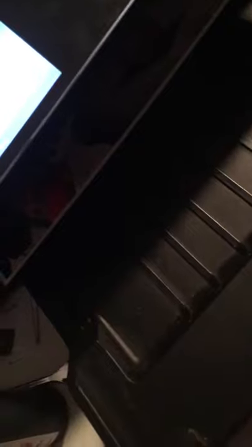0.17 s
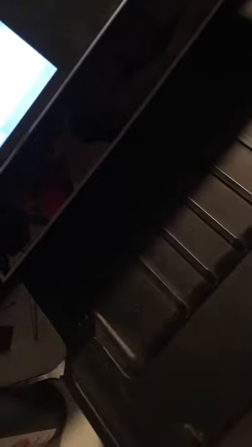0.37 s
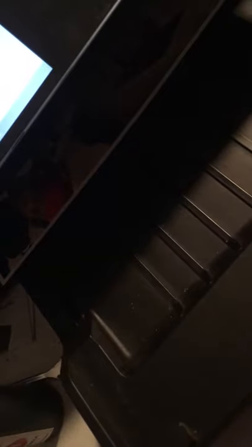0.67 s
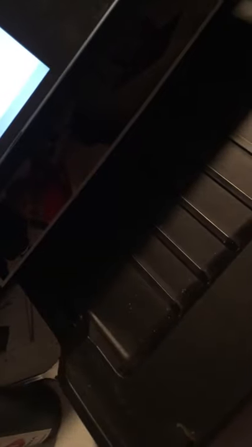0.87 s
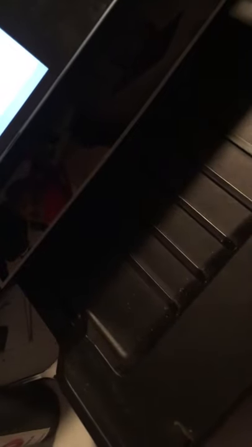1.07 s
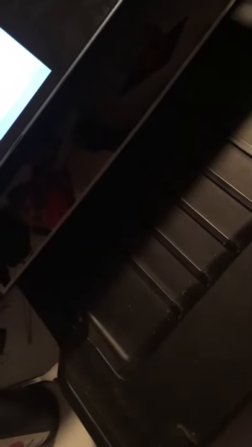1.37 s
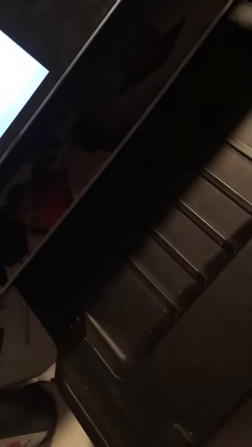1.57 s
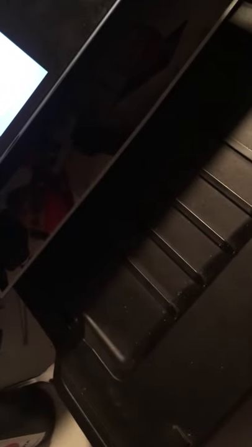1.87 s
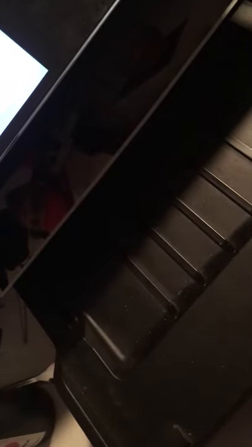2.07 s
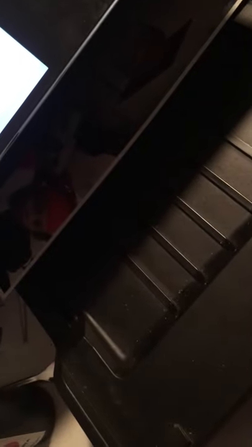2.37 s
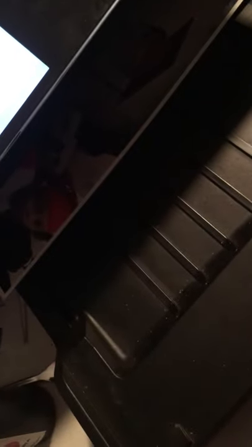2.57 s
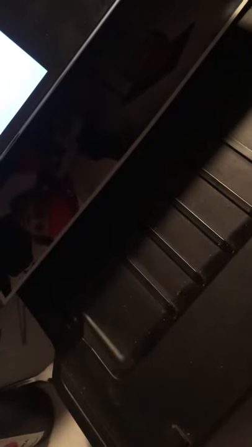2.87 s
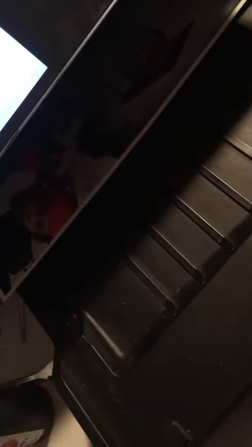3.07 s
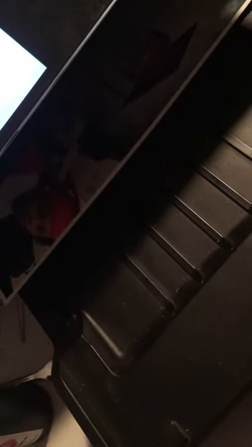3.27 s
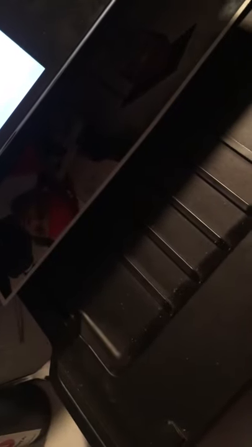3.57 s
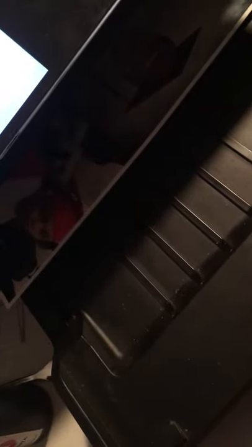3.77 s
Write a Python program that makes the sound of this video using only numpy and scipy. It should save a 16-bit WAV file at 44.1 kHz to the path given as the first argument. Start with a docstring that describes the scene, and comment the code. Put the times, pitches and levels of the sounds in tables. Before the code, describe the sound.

A printer at work indoors: short motor whines, sliding hiss, rhythmic clatters and low thumps.

```python
"""Room rumble, fan hum and the tail of a paper-feed clatter open, then a casing thump: an inkjet printer at work.
The carriage sweeps to and fro: whine harmonics follow its speed, and coloured noise with rail rings is the sliding hiss.
At each turn the feed clatters (struck gear and panel modes, sheet hiss) and the casing thumps (low modes).
A short echo follows the printer. Mono microphone, two equal channels."""
import sys
import numpy as np
from scipy import signal
from scipy.fft import rfft, irfft
from scipy.io import wavfile

SR = 44100
rng = np.random.default_rng(int(sys.argv[2]) if len(sys.argv) > 2 else 0)


def store_wav(level_fs):
    """Save 16-bit WAV to argv[1]."""
    pcm = np.round(np.clip(np.atleast_2d(level_fs), -1, 1) * 32767)
    wavfile.write(sys.argv[1], SR, pcm.T.astype(np.int16))


def voltage_ratio(level):
    """Linear amplitude factor for a level in decibels (scalar or array-like)."""
    return 10 ** (np.asarray(level, float) / 20)


N = 172872

# carriage turns with paper feed, outward and return strokes alternating: start_s, relative clatter_db, hiss_db
TURNS = [(.012, -56, -54.5), (.469, -50.5, -63), (.918, -54, -59.5), (1.371, -51, -61),
         (1.821, -50.5, -60.5), (2.275, -49, -61), (2.726, -52, -60), (3.179, -50, -61.5),
         (3.631, -54.5, -59.5)]
# feed gear modes: pitch_hz, relative level_db, t60_s
GEAR_MODES = [(2343, -6, 0.033), (2445, -9.5, 0.019), (2016, -12.5, 0.026), (2810, -16, 0.024),
              (3200, -18, 0.025)]
# plastic panel modes: pitch_hz, relative level_db, t60_s, rattle lag_s
PANEL_MODES = [(248, 2.5, 0.05, 0.0373), (324, -2, 0.067, 0.019), (394, -0.5, 0.064, 0.0084),
               (642, -0.5, 0.033, 0.02), (876, 5, 0.022, 0.0063), (1120, -2, 0.023, 0.0053),
               (1420, -7, 0.011, 0.0047), (1660, -8.5, 0.017, 0.00083)]


def rms_one(x):
    """Scales to rms 1."""
    return x / np.sqrt(np.mean(x ** 2) + 1e-20)


def drift(rate_hz):
    """Slow random wander of rms 1: noise through two equal poles at rate_hz."""
    hop = 40  # samples between computed points
    pole = np.exp(-2 * np.pi * rate_hz * hop / SR)
    noise = rng.standard_normal(N // hop + 2002)
    slow = signal.lfilter([1], [1, -2 * pole, pole * pole], noise)[2000:]
    return np.interp(np.arange(N) / hop, np.arange(len(slow)), rms_one(slow))


def ring(drive, pitch_hz, t60_s):
    """Two-pole resonator: a unit click starts a decaying sine of height about 1."""
    r = voltage_ratio(-60 / (t60_s * SR))
    w = 2 * np.pi * pitch_hz / SR
    return signal.lfilter([0, np.sin(w)], [1, -2 * r * np.cos(w), r * r], drive + 1e-18)


def coloured(spectrum, patchy_db):
    """Noise of the given spectrum, rms 1; half-octave bands flicker independently."""
    hz, level_db = np.transpose(spectrum)
    f = np.maximum(np.fft.rfftfreq(N, 1 / SR), 1)
    gain_db = np.interp(np.log(f), np.log(hz), level_db, left=-60, right=-60)
    shaped = rfft(rng.standard_normal(N)) * voltage_ratio(gain_db)
    band = np.round(2 * np.log2(f)).astype(int)
    lowest = band[f >= hz[0] / 2][0]
    total = np.zeros(N)
    for b in range(lowest, band[-1] + 1):
        total += irfft(shaped * (band == b), N) * voltage_ratio(patchy_db * drift(8))
    return rms_one(total)


def stroke():
    """Time since the last turn and the index of that turn."""
    t = np.arange(N) / SR
    turn_s = np.array(TURNS)[:, 0]
    k = np.maximum(np.searchsorted(turn_s, t, "right") - 1, 0)
    return t - turn_s[k], k


def along(table):
    """Reads the outward or the return column over each stroke."""
    since_s, k = stroke()
    s, out, back = np.transpose(table)
    return np.where(k % 2, np.interp(since_s, s, back), np.interp(since_s, s, out))


def gate(since_s, rise_s, hold_s, fall_s):
    """Linear rise, level until hold_s, then exponential fall with time constant fall_s."""
    return np.clip(since_s / rise_s, 0, 1) * np.exp(-np.maximum(since_s - hold_s, 0) / fall_s)


def grains(rate_per_s, spread_db):
    """Random clicks of uneven size and sign."""
    hit = rng.random(N) < rate_per_s / SR
    size = voltage_ratio(spread_db * np.minimum(rng.exponential(1, N), 4))
    return hit * size * rng.choice([-1, 1], N)


def strike(events, modes, spread_db, contact_s):
    """Each blow excites every mode with its own random strength and a delay below contact_s."""
    s, db = np.transpose(events)
    vary = rng.standard_normal((len(s), len(modes)))
    late = rng.random((len(s), len(modes)))
    out = np.zeros(N)
    for k, mode in enumerate(modes):
        clicks = np.zeros(N)
        at = ((s + contact_s * late[:, k]) * SR).astype(int)
        clicks[at] = voltage_ratio(db + mode[1] + spread_db * vary[:, k])
        out += ring(clicks, mode[0], mode[2])
    return out


def room_tone():
    """Coloured noise and a low room resonance for rumble; fan lines wavering in level and phase."""
    # room noise spectrum: pitch_hz, relative density_db (per Hz)
    room_spectrum = [(18, -36), (30, -2.5), (118, 2), (303, -11.5), (473, -20), (1010, -14.5), (1760, -26),
                     (1950, -22), (2170, -27), (5030, -36.5), (7070, -35), (10200, -42.5), (11700, -42),
                     (16000, -42)]
    # fan lines: pitch_hz, rms level_db
    fan_lines = [(194, -64.5), (243, -70.5), (291.5, -68), (388, -72.5), (587, -80.5)]
    t = np.arange(N) / SR
    fan = np.zeros(N)
    for hz, db in fan_lines:
        level = np.sqrt(2) * voltage_ratio(db + 3.46 * drift(2.16))
        fan += level * np.sin(2 * np.pi * hz * t + 1.0 * drift(2.9))
    noise = voltage_ratio(-53.5) * coloured(room_spectrum, patchy_db=2)
    rumble = voltage_ratio(-62.5) * rms_one(ring(rng.standard_normal(N), pitch_hz=56.7, t60_s=0.29))
    return noise + fan + rumble


def paper_feed():
    """Click-driven gear and panel modes for ticks, chatter and rattle; gated noise for the sheet's hiss."""
    # feed gear ticks: start_s, relative level_db
    ticks = [(0.476, -40), (0.9184, -38.5), (0.9287, -42), (0.971, -47), (1.3703, -42.5), (1.8206, -43),
             (1.8514, -53), (1.8775, -45), (2.2766, -43.5), (2.3476, -53), (2.7269, -37), (2.7327, -47),
             (2.7454, -44.5), (2.7756, -46), (2.7936, -55), (3.1785, -43), (3.189, -40), (3.6306, -46),
             (3.6577, -34.5), (3.6787, -48)]
    # sheet hiss spectrum: pitch_hz, relative density_db (per Hz)
    sheet_spectrum = [(1530, -37), (2600, -3), (4490, 1), (4920, -4.5), (6620, 3.5), (10300, -3),
                      (11700, 2), (16000, -9.5)]
    since_s, k = stroke()
    _, clatter_db, hiss_db = np.array(TURNS)[k].T

    chatter_clicks = grains(600, spread_db=2.5) * gate(since_s, rise_s=0.0022, hold_s=0.077, fall_s=0.0071)
    chatter = sum(voltage_ratio(db) * ring(chatter_clicks, hz, t60_s) for hz, db, t60_s in GEAR_MODES)
    gear = strike(ticks, GEAR_MODES, spread_db=-1.0, contact_s=0.0013) + voltage_ratio(-63.5) * chatter

    panels = np.zeros(N)
    for hz, db, t60_s, lag_s in PANEL_MODES:
        envelope = gate(since_s - lag_s, rise_s=0.002, hold_s=0.047, fall_s=0.022)
        clicks = grains(700, spread_db=3.0) * envelope * voltage_ratio(clatter_db - 12)
        panels += voltage_ratio(db) * ring(clicks, hz, t60_s)

    sheet = coloured(sheet_spectrum, patchy_db=2.5) * voltage_ratio(hiss_db + 2.0 * drift(120))
    sheet = sheet * gate(since_s, rise_s=0.0012, hold_s=0.044, fall_s=0.0083)
    return gear + panels + sheet


def casing():
    """Struck low modes thump over a noise-driven drone; panel modes give clunks, panel and gear modes knocks."""
    # casing thumps: start_s, relative level_db
    thumps = [(0.076, -36.5), (0.097, -58), (0.509, -37), (0.554, -36.5), (0.967, -41), (0.993, -42),
              (1.411, -33.5), (1.446, -37), (1.87, -39), (1.9, -42.5), (2.317, -35.5), (2.369, -39),
              (2.776, -36.5), (2.803, -48), (3.224, -33), (3.274, -39), (3.681, -39), (3.709, -41)]
    # casing modes: pitch_hz, relative level_db, t60_s
    casing_modes = [(94, -14, 0.082), (112.6, -1, 0.28), (131.7, -1.5, 0.11), (200.4, -10.5, 0.13)]
    # casing drone over a stroke: after_turn_s, outward_db, return_db
    drone_levels = [(0, -58, -59.5), (.08, -54.5, -48), (.2, -56, -49), (.25, -56.5, -62.5),
                    (.45, -57.5, -60.5)]
    # clunks as the feed takes hold: start_s, relative level_db
    clunk_blows = [(0.481, -38), (0.927, -42), (1.388, -45), (1.838, -41), (2.288, -35), (2.737, -34),
                   (3.189, -39), (3.643, -32.5)]
    # small mid-stroke knocks: start_s, relative level_db
    knock_blows = [(0.61, -43), (0.833, -47), (1.5, -41), (1.736, -42.5), (2.419, -51), (2.64, -42),
                   (3.319, -49), (3.541, -41.5)]
    spread_db, knock_contact_s = 1.5, 0.012
    thump = voltage_ratio(-4.5) * strike(thumps, casing_modes, spread_db, contact_s=0.0013)
    drone = voltage_ratio(along(drone_levels)) * rms_one(ring(rng.standard_normal(N), pitch_hz=112.26, t60_s=0.21))
    clunks = voltage_ratio(-9) * strike(clunk_blows, PANEL_MODES[2:], spread_db, contact_s=0.014)
    body = strike(knock_blows, PANEL_MODES, spread_db, knock_contact_s)
    snap = strike(knock_blows, GEAR_MODES, spread_db, knock_contact_s)
    return thump + drone + clunks + voltage_ratio(-9.5) * (body + snap)


def motor_whine():
    """Harmonics of the belt-tooth rate follow carriage speed and excite housing resonances."""
    # carriage speed over a stroke: after_turn_s, share of full speed
    speed_curve = [(.07, .45), (.132, .82), (.147, .90), (.167, .965), (.19, 1.0), (.385, 1.0), (.405, .94),
                   (.42, .83), (.46, .45)]
    # whine over a stroke: after_turn_s, outward_db, return_db
    whine_levels = [(.11, -84, -90), (.145, -60, -56), (.18, -68.5, -67), (.22, -62.5, -64.5),
                    (.29, -58.5, -66), (.325, -54, -61), (.37, -58.5, -73), (.415, -63, -62.5),
                    (.44, -107, -88)]
    # overtones: multiple, relative level_db
    overtones = [(1, -3.5), (2, -14), (3, -21)]
    # ringing housing resonances: pitch_hz, added gain_db on top, t60_s
    housing = [(899, 10, 0.15), (1956, 8, 0.046)]
    # tenth overtone over a stroke: after_turn_s, level_db
    tenth_levels = [(.11, -90), (.135, -71), (.17, -75.5), (.22, -78.5), (.37, -75.5), (.405, -71),
                    (.43, -92)]
    full_speed_hz, waver_share, flicker_db = 1008, 0.005, 4.0
    since_s, _ = stroke()
    speed = np.interp(since_s, *np.transpose(speed_curve)) * (1 + waver_share * drift(23))
    phase = 2 * np.pi * np.cumsum(full_speed_hz * speed) / SR

    whine = np.zeros(N)
    for k, (multiple, db) in enumerate(overtones):
        whine += np.sqrt(2) * voltage_ratio(db + flicker_db * drift(60)) * np.sin(multiple * phase + k)
    whine = voltage_ratio(along(whine_levels)) * whine

    resonant = np.zeros(N)
    for hz, db, t60_s in housing:
        unit_gain = 2 * np.log(1000) / (t60_s * SR)  # brings the resonance peak to about 1
        resonant += voltage_ratio(db) * unit_gain * ring(whine, hz, t60_s)

    tenth_db = np.interp(since_s, *np.transpose(tenth_levels)) + flicker_db * drift(57)
    return whine + resonant + np.sqrt(2) * voltage_ratio(tenth_db) * np.sin(10 * phase)


def carriage_whistle():
    """Rough sine that climbs in pitch as the outward stroke gathers speed."""
    # whistle over an outward stroke: after_turn_s, pitch_hz, level_db
    whistle_curve = [(.09, 3100, -92), (.115, 3350, -78), (.17, 3950, -75), (.21, 4200, -76),
                     (.24, 4250, -90)]
    since_s, turn = stroke()
    s, pitch_hz, level_db = np.transpose(whistle_curve)
    level = voltage_ratio(np.interp(since_s, s, level_db) + 2.1 * drift(53))
    rough_hz = np.interp(since_s, s, pitch_hz) * (1 + 0.02 * drift(150))
    outward = turn % 2 == 0
    return outward * level * np.sqrt(2) * np.sin(2 * np.pi * np.cumsum(rough_hz) / SR)


def sliding_hiss():
    """Coloured noise plus grain-driven rail resonances, levelled along the stroke."""
    # hiss over a stroke: after_turn_s, outward_db, return_db
    slide_levels = [(.07, -100, -73), (.10, -69, -72), (.14, -62, -61), (.20, -62.5, -61.5),
                    (.30, -63.5, -62.5), (.365, -65, -61.5), (.39, -55.5, -59.5), (.415, -64.5, -63.5),
                    (.45, -73, -71.5)]
    # hiss spectrum: pitch_hz, relative density_db (per Hz)
    slide_spectrum = [(710, -13), (1200, -12.5), (1570, 0.5), (1850, -18.5), (2000, -8.5), (2730, -7.5),
                      (2950, -8), (3540, -9), (3990, -5), (4350, -10.5), (7320, -4.5), (9090, -9.5),
                      (11300, -7), (15000, -3.5), (16000, -12)]
    # rail resonances: pitch_hz, damping_hz (t60_s = 1.3 / damping_hz), relative level_db
    rail_modes = [(6910, 83, 3.5), (9810, 74, -3), (11200, 84, 5.5), (11760, 77, 1.5), (12550, 110, 6),
                  (14000, 31, 1), (14500, 78, -13)]
    rail = np.zeros(N)
    for hz, damping_hz, db in rail_modes:
        tone = rms_one(ring(grains(1400, spread_db=3.0), hz, 1.3 / damping_hz))
        rail += voltage_ratio(db + 2.5 * drift(12)) * tone
    hiss = coloured(slide_spectrum, patchy_db=0.94) + voltage_ratio(-7) * rms_one(rail)
    return voltage_ratio(along(slide_levels)) * hiss * voltage_ratio(1.5 * drift(60))


def carriage():
    """Motor whine, whistle and sliding hiss, all following the stroke."""
    return motor_whine() + carriage_whistle() + sliding_hiss()


def room_echo(dry_sound):
    """Decaying noise tail of unit energy, starting after 4 ms."""
    t60_s = 0.14
    lag_s = np.arange(SR // 3) / SR
    tail = rng.standard_normal(len(lag_s)) * voltage_ratio(-60 * lag_s / t60_s) * (lag_s > 0.004)
    return signal.fftconvolve(dry_sound, tail / np.linalg.norm(tail))[:N]


def scene():
    """Printer with its echo over the room tone, in two equal channels."""
    room = room_tone()
    printer = paper_feed() + casing() + carriage()
    return np.tile(printer + voltage_ratio(-12) * room_echo(printer) + room, (2, 1))


def band_limit(x):
    """A steep low-pass at the top of the band."""
    return signal.sosfilt(signal.butter(12, 16120, fs=SR, output="sos"), x)


def record(dry):
    """The microphone drops the deepest bass; silence, then a quick fade-in."""
    start_s, fade_s, low_cut_hz = 0.071, 0.001, 41.7
    high_pass = signal.butter(6, low_cut_hz, "high", fs=SR, output="sos")
    heard = signal.sosfilt(high_pass, dry)
    fade = np.clip((np.arange(N) / SR - start_s) / fade_s, 0, 1)
    return band_limit(heard * fade)


dry = scene()
out = record(dry)
store_wav(out)
```